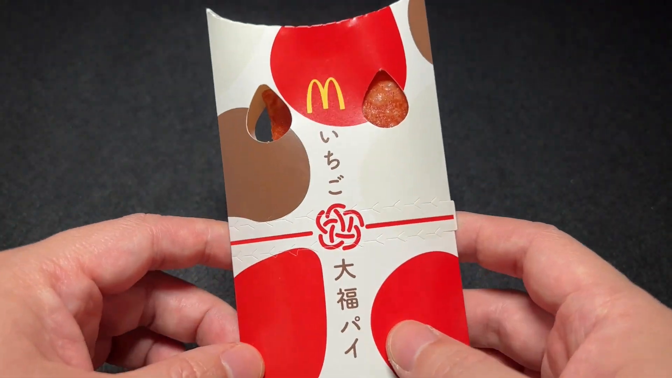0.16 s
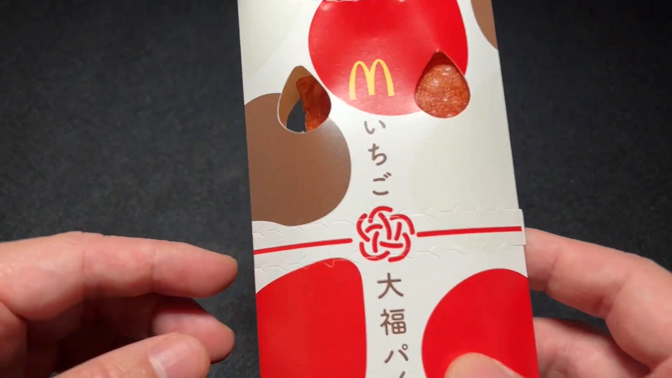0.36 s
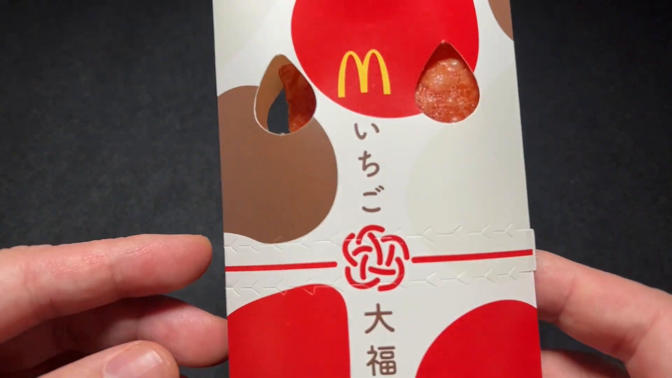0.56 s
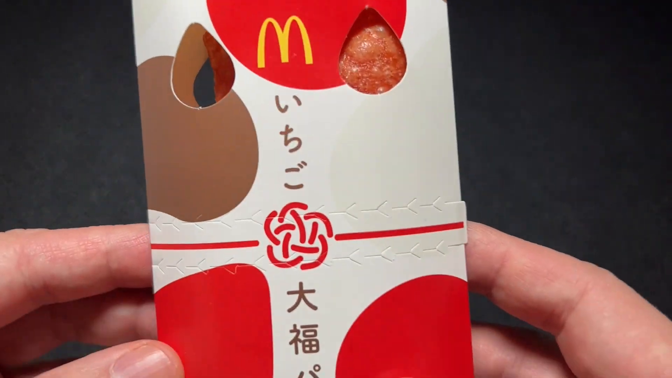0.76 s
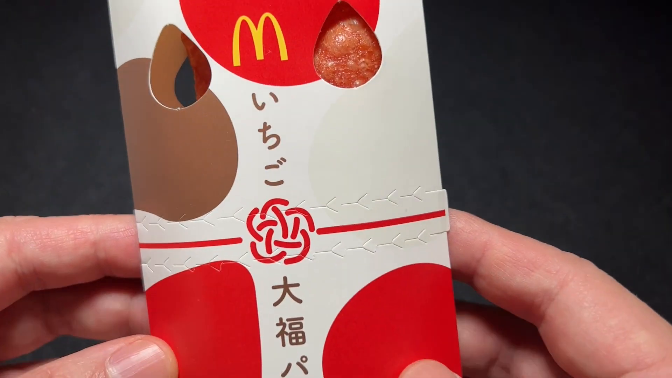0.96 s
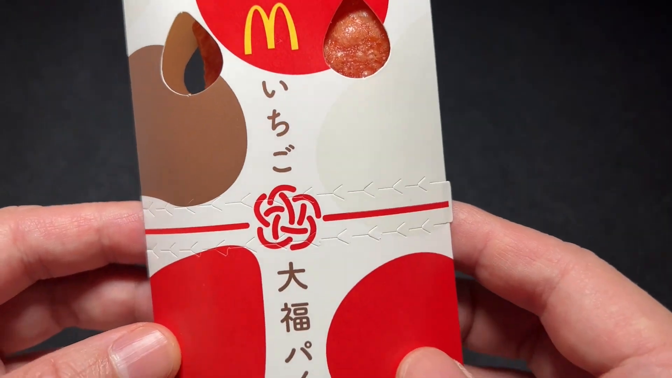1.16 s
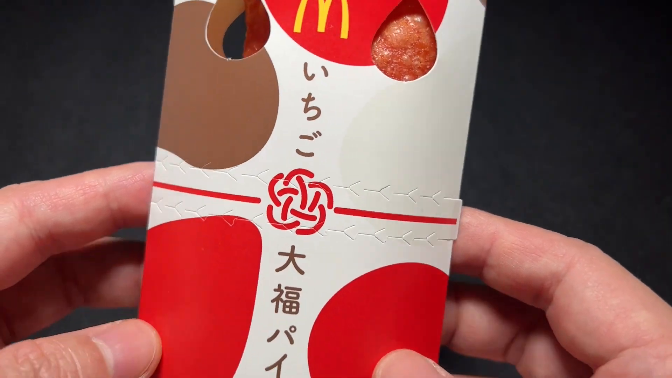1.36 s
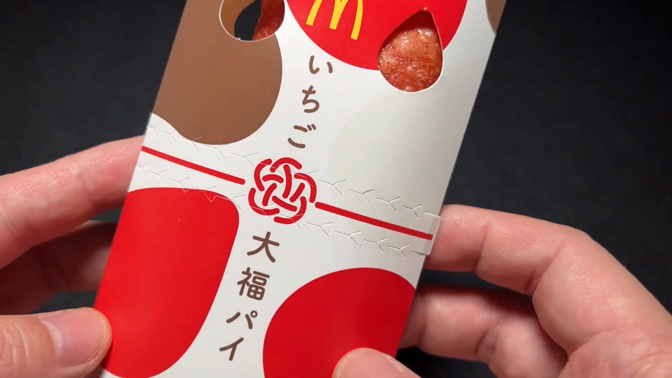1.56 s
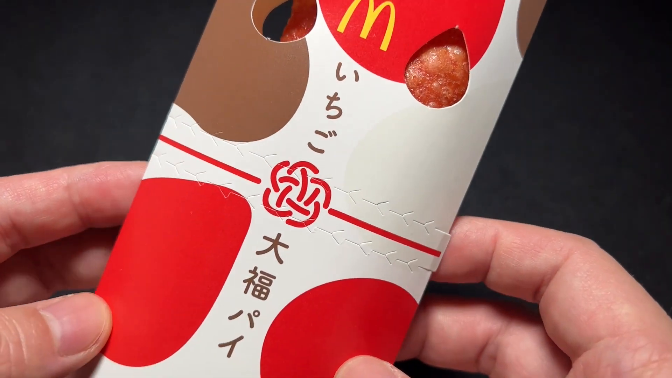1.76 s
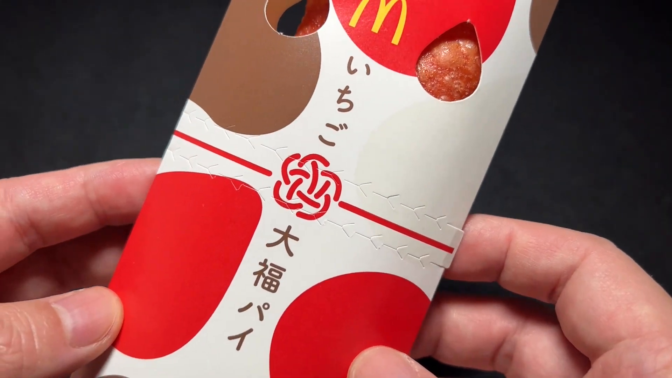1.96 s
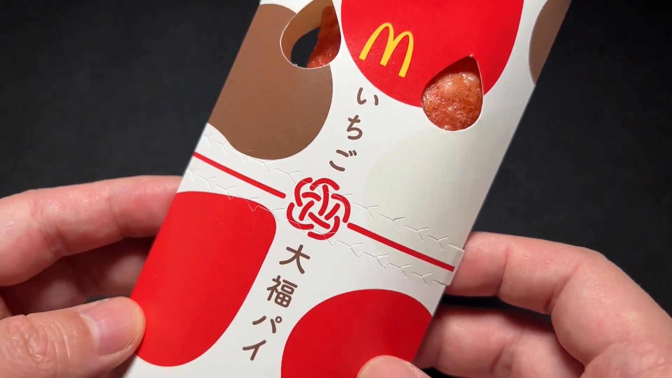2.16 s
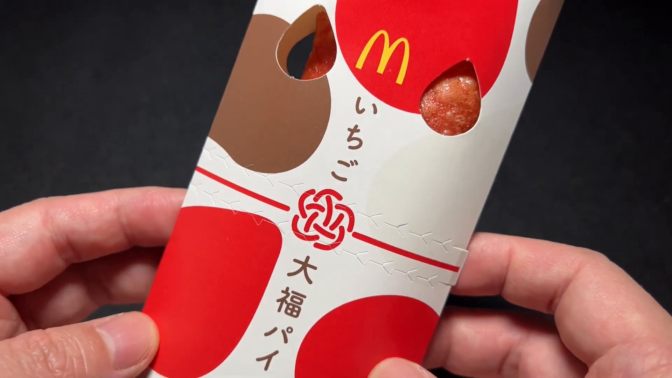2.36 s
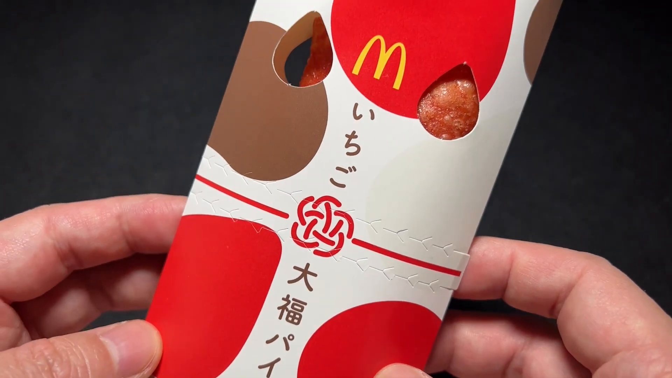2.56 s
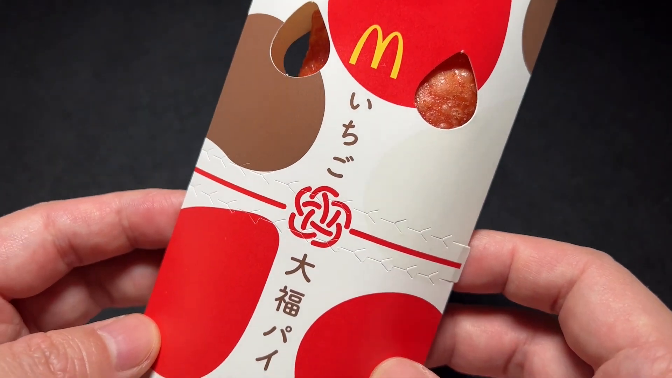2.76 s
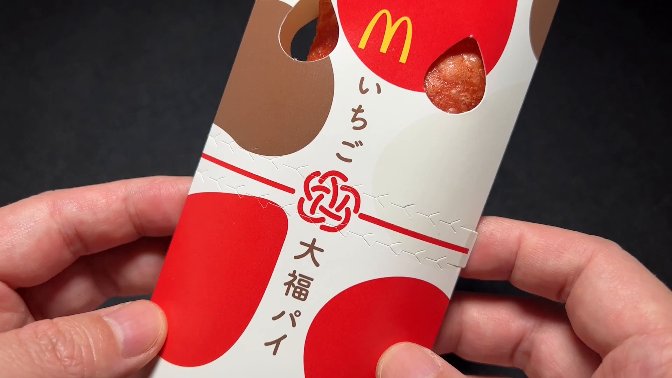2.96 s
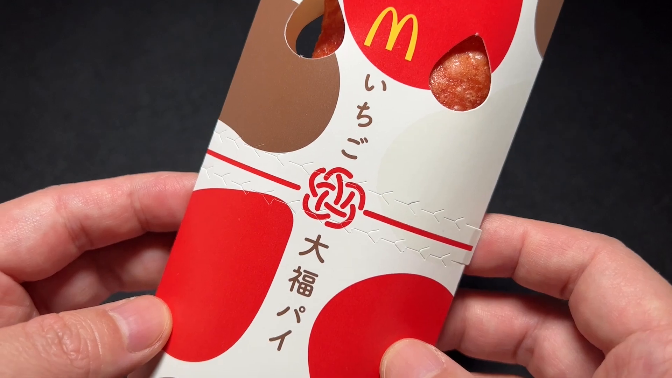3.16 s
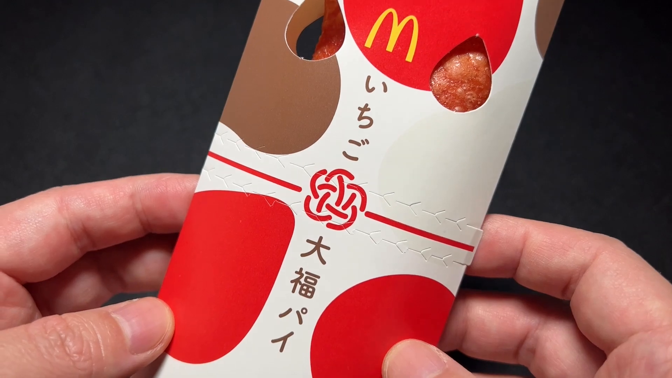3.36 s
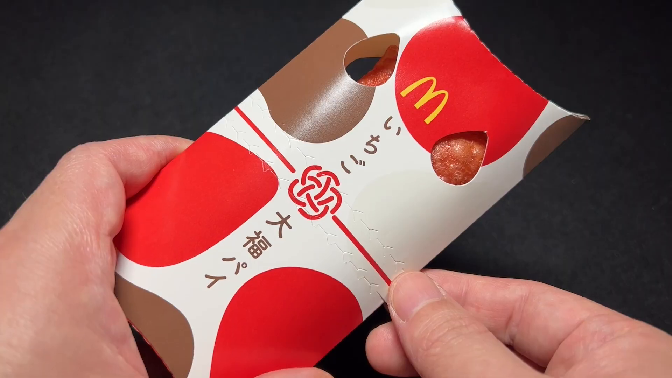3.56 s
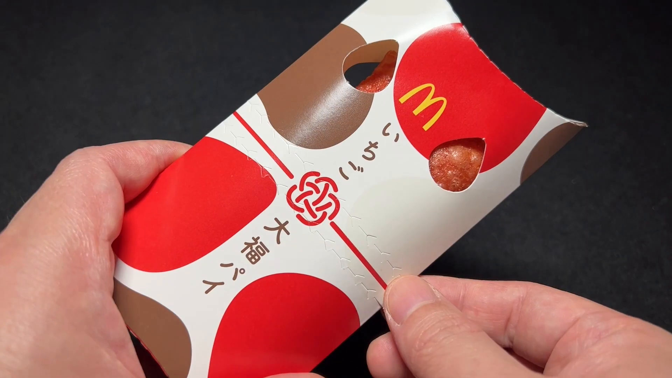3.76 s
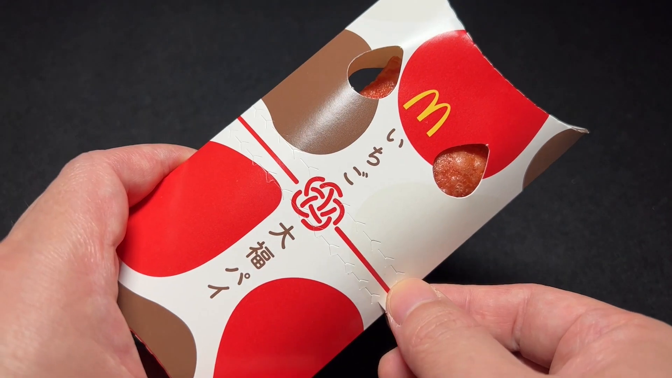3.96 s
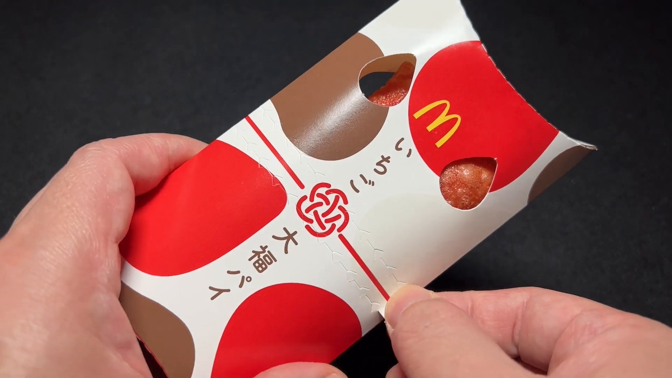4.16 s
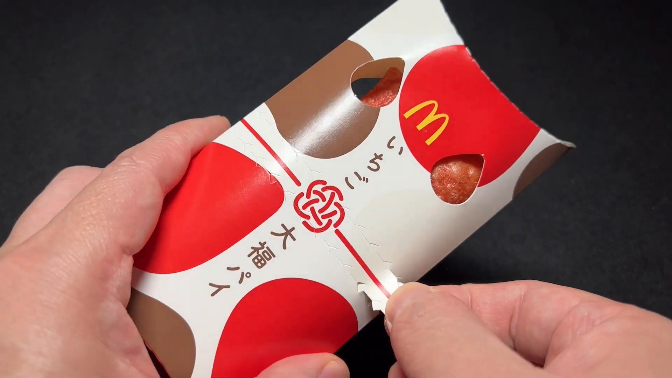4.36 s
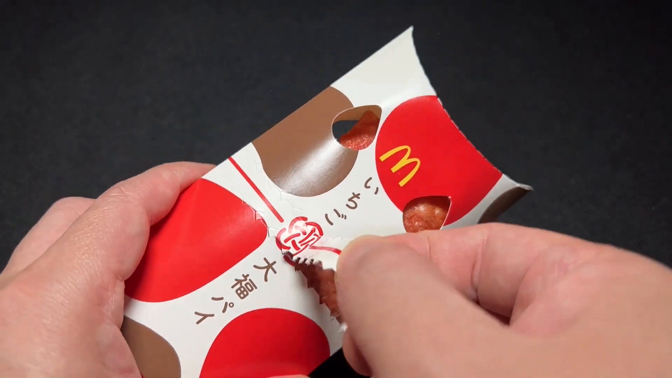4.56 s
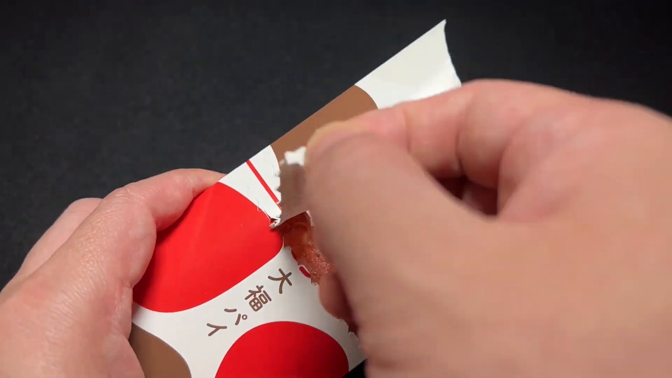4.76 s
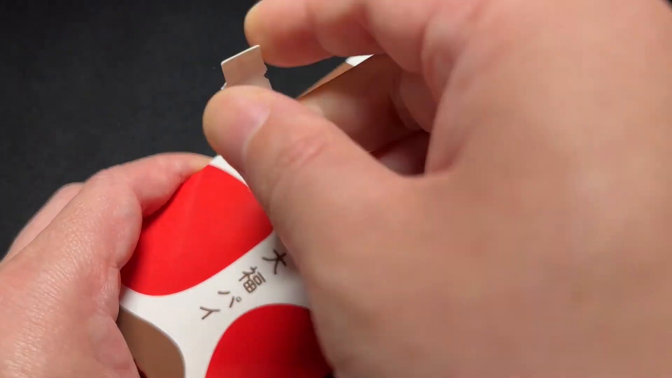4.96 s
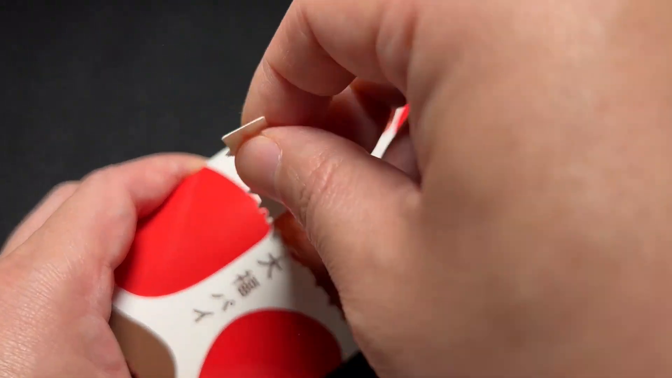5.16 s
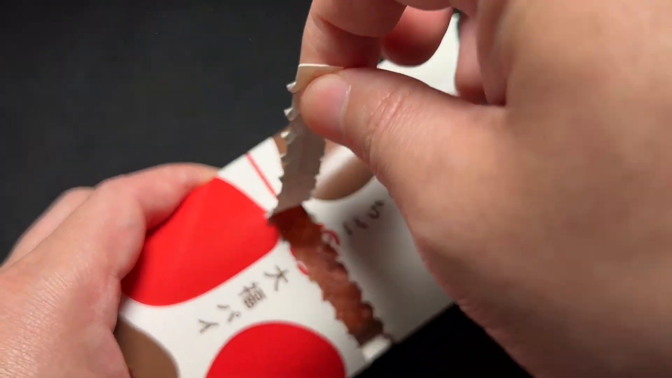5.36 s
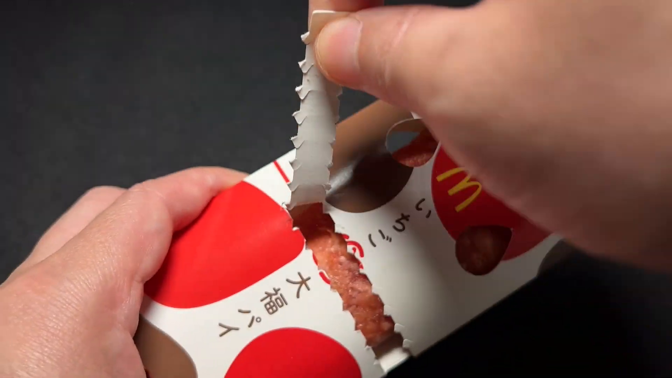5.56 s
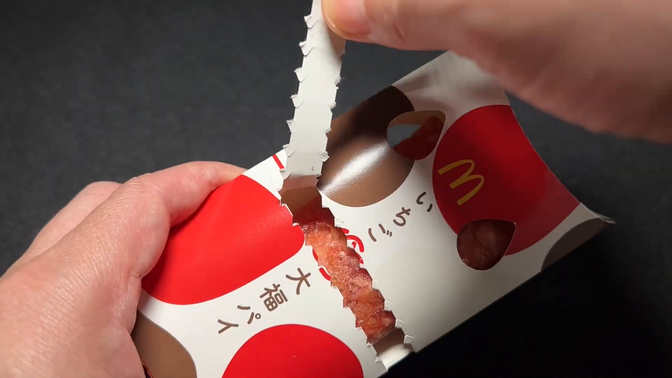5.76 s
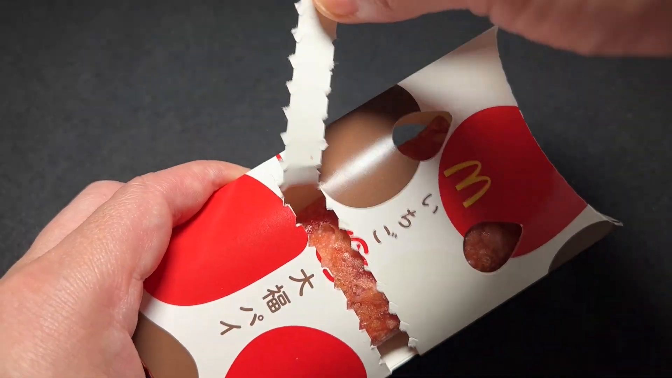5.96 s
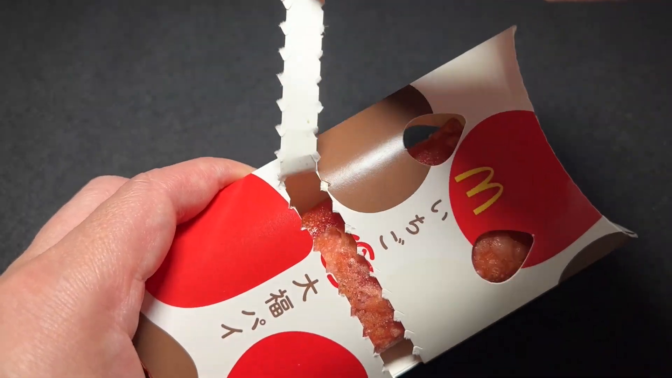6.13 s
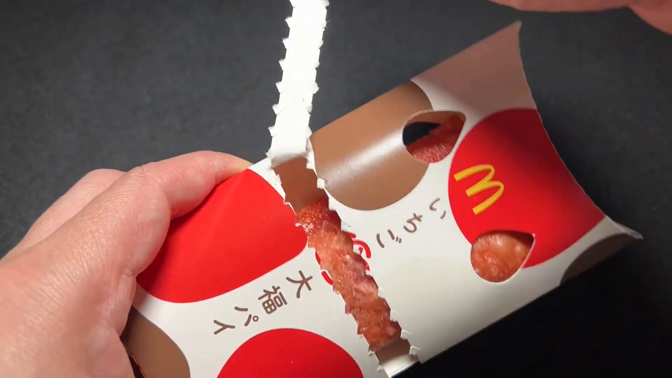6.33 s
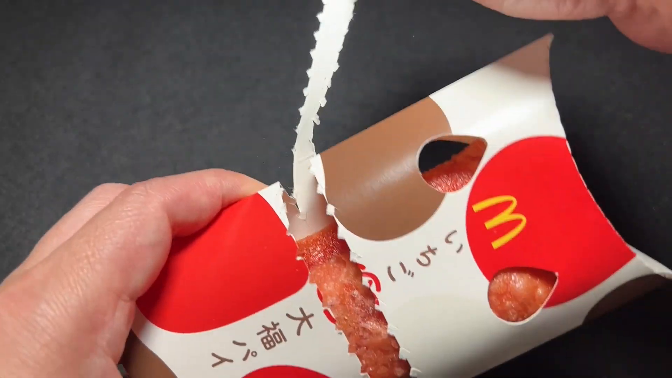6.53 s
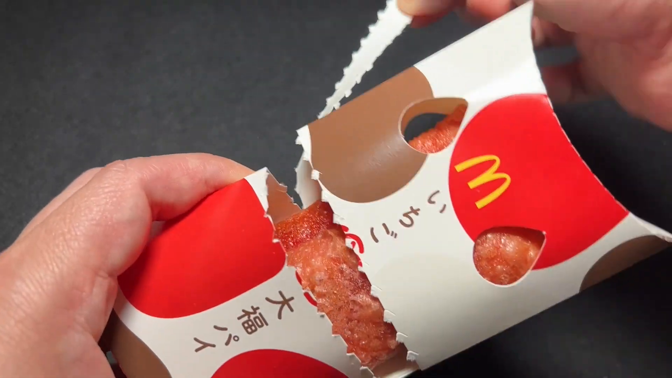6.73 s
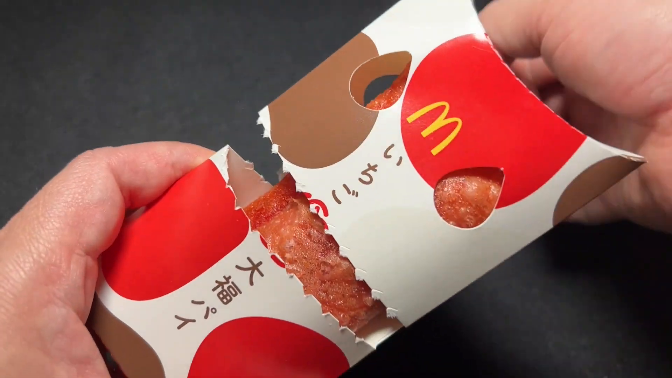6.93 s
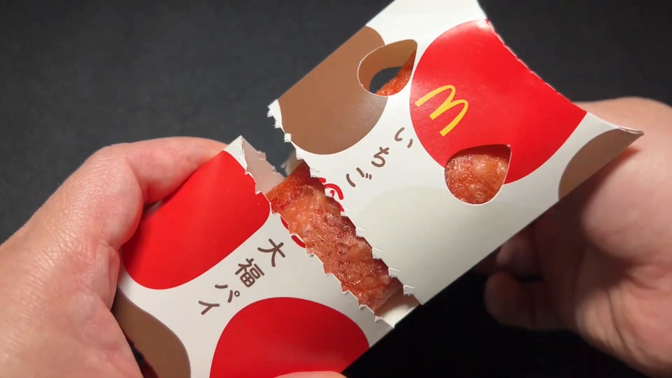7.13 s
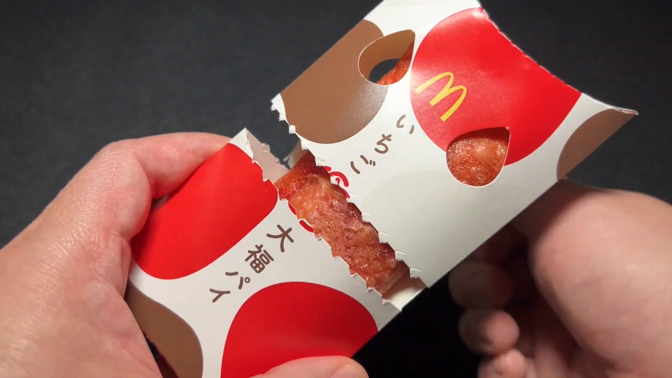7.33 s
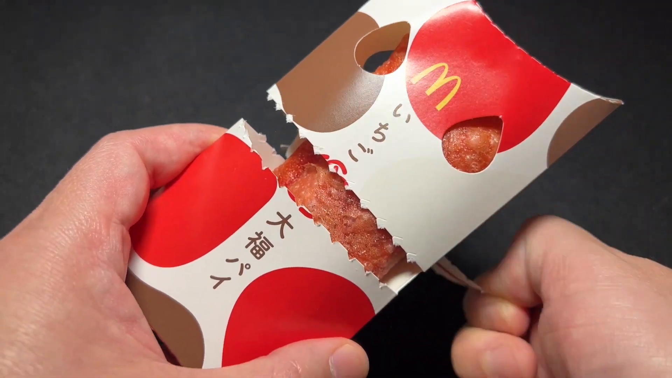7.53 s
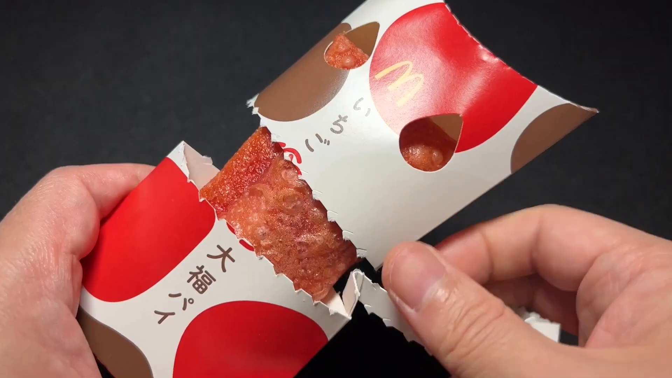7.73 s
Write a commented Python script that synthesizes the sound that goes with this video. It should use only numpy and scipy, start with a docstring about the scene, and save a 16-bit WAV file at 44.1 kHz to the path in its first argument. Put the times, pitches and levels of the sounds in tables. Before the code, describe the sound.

A paperboard sleeve is softly rubbed by fingers, then ripped along a perforated strip in sharp crackling snaps, close up in a quiet room.

```python
"""Tearing open a paperboard sleeve

In a quiet room, close to a two-port microphone, a paperboard sleeve is handled, then torn along a perforated strip.
Each paper bridge snaps as a noise crack that rings the sleeve through resonances and jolts the carton.
Fluttering noise makes the rubbing fingers and ripping fibres, with tiny pings for single fibres.
Behind them lies a faint hum: shaped noise for ventilation rumble and microphone hiss."""
import sys
import numpy as np
from scipy import signal
from scipy.fft import rfft, irfft, next_fast_len
from scipy.io import wavfile
from scipy.ndimage import uniform_filter1d, map_coordinates

SR = 44100
rng = np.random.default_rng(int(sys.argv[2]) if len(sys.argv) > 2 else 0)


def wrap_up_sound(samples):
    """Save the sound to the file named by the first command line argument, as 16-bit audio."""
    columns = np.atleast_2d(samples).T
    # keep every value between -1 and 1, then stretch to whole-number steps
    tamed = np.clip(columns, -1, 1)
    steps = np.round(tamed * 32767).astype(np.int16)
    wavfile.write(sys.argv[1], SR, steps)


N = 343539  # length [samples]

# Snaps and ticks of the board:
# (time [s], level [dB], panel pitch [Hz], ring peak over crack peak [dB], thump level over crack peak [dB])
BOARD_SNAPS = [(0.2115, -30.5, 1470, -6, -25), (0.6794, -49, 1550, 18.5, 6), (0.7071, -48, 790, 19, 7),
               (3.779, -34.5, 2610, -33, -57), (3.8537, -40.5, 1620, -15, -44),
               (3.926, -38.5, 1470, -11, -49), (4.0041, -40.5, 950, 3, -21), (4.232, -38.5, 1308, 7, -19),
               (4.273, -23, 1680, -41, -41.5), (4.322, -25, 1580, 8, -30.5), (4.3373, -18, 1540, 12.5, -14),
               (4.345, -1, 1176, -10, -48), (4.384, -12.5, 893, 3, -13.5), (4.3977, -1.5, 1084, -16, -20),
               (4.4342, -6, 1440, -7, -26.5), (4.4398, -2, 1450, -4, -17), (4.466, -4, 1235, -4.5, -20),
               (4.476, -6, 1286, -3, -26.5), (4.489, -7.5, 2020, -9, -39.5), (4.5, -6.5, 1390, 4, -39),
               (4.5129, -1.5, 1599, -7, -18.5), (4.5377, -13, 1305, 7, -12.5), (4.5731, -9, 2383, -10, -42),
               (4.581, -4.5, 1383, 1.5, -37), (4.598, -8, 1260, 1, -15), (4.643, -17, 2310, 7.5, -2),
               (4.6848, -9, 1240, -3, -19), (4.8271, -46, 1060, 22, 4.5), (4.866, -41.5, 1280, 16.5, -6),
               (4.961, -47, 1280, 5, -10.5), (5.1132, -24, 1387, -2.5, -21), (5.3485, -36, 1750, -7, -55),
               (5.432, -27, 1680, -13, -83), (5.486, -28.5, 1290, -12, -48), (5.5138, -5, 1155, -8, -26),
               (5.553, -20, 1150, -7, -37), (5.58, -7, 1020, -7.5, -30.5), (5.719, -39, 2330, -14.5, -43),
               (5.904, -34, 2750, -24, -38), (5.9595, -8, 2400, -6.5, -29), (5.9993, -30, 2480, -7.5, -27),
               (6.062, -32, 1300, -6.5, -49), (6.093, -21.5, 2140, 3, -31), (6.099, -17, 2950, -2, -30),
               (6.147, -36, 1410, -6, -32), (6.217, -35.5, 2320, -35, -46), (6.2362, -35, 1090, -31, -53),
               (6.2999, -16.5, 2680, -34, -55.5), (6.3131, -19, 2730, -6.5, -46),
               (6.322, -14.5, 2690, 1, -16.5), (6.3438, -7.5, 2820, -2.5, -21),
               (6.3596, -15.5, 1960, 2.5, -27.5), (6.3676, -10, 2685, 5, -21),
               (6.402, -17.5, 1230, -8.5, -62), (6.4112, -11.5, 1340, -11, -25),
               (6.548, -35.5, 1480, 7, -34.5), (6.56, -5.5, 1226, -2, -34), (6.5991, -19, 1590, 3, -28),
               (6.6192, -12.5, 2470, 4, -43), (6.664, -34, 1700, 4, -49.5), (6.6737, -14, 1240, -11, -37),
               (6.751, -20, 1230, -3, -23), (6.7765, -10, 1090, 3, -11), (6.927, -40.5, 1070, -7, -28),
               (7.141, -30, 1720, -5, -49), (7.334, -28, 1047, -16, -48), (7.409, -25, 1090, -9, -52),
               (7.4307, -23, 2670, -6.5, -59), (7.5395, -13.5, 1530, -8.5, -27),
               (7.549, -18.5, 1540, -15, -38), (7.5763, -26.5, 1400, 8.5, -15),
               (7.612, -11.5, 1070, 1, -18)]
# The tear travels round the sleeve and changes what it shakes:
# (time [s], low knock pitch [Hz], low knock level [dB], upper modes level [dB])
TEAR_PATH = [(0.7, 680, 9.5, 1), (4.5, 540, 0.5, -1), (6.2, 453, -8.5, 2.5), (6.8, 603, 5.5, 4),
             (7.6, 330, 2.5, -2.5)]
# Resonances of the hollow sleeve, before the tear's weighting: (frequency [Hz], width [Hz], level [dB])
SLEEVE_MODES = [(396, 36, -14), (790, 30, -20.5), (1330, 120, -15), (2180, 160, -10), (2574, 120, -8.5)]
# Colour of breaking fibres: (frequency [Hz], level [dB])
CRACK_COLOUR = [(300, -43), (2000, -3), (4000, -7.5), (6000, -4.5), (9000, -5.5), (12500, 0.5),
                (16000, -11)]
# Likeness of the two ports for sounds close by: (frequency [Hz], left-right likeness [0-1])
NEAR_LIKENESS = [(100, 0.99), (500, 0.65), (1700, 0.58), (3500, 0.4), (8000, 0.72)]


def snaps():
    """Paper bridges break: a bright crack, a brief ring of panel and sleeve, a jolt of the whole carton."""
    lead = 400  # samples of swell ahead of the listed time
    out = np.zeros((2, N + SR))
    t = (np.arange(4000) - lead) / SR - .001  # the break comes 1 ms after the listed time
    tear_s, *tear = np.transpose(TEAR_PATH)
    for s, db, panel_hz, ring_db, thump_db in BOARD_SNAPS:
        knock_hz, knock_db, upper_db = (np.interp(s, tear_s, column) for column in tear)
        swell = 0.00081 * amp(db / 4)  # [s]; big bridges stretch before they part, small ticks are sudden
        blow = peak(crack(t, swell)) + amp(ring_db) * peak(ring(t, swell, panel_hz, knock_db, upper_db))
        jolt = amp(thump_db) * peak(thump(t, knock_hz, knock_db))
        start = round(s * SR) - lead
        out[:, start:start + len(t)] += amp(db) * (ports(blow, NEAR_LIKENESS) + jolt)
    return out[:, :N]


def crack(t, swell):
    """Breaking fibres: a short noise burst and a fainter, longer one, coloured by small torn flaps."""
    flap_hz = np.exp(rng.uniform(np.log(3500), np.log(9000), 3))  # new flaps for each crack
    noise = burst(t, swell, 0.013) + 0.21 * burst(t, 6 * swell, 0.057)

    def colour(f):
        flaps = sum(mode(f, hz, 300) for hz in flap_hz)
        return amp(along(CRACK_COLOUR, f)) * (0.88 + flaps)

    return filtered(noise, colour)


def ring(t, swell, panel_hz, knock_db, upper_db):
    """Noise bursts excite the panel's resonance, the hollow sleeve's modes and one broad resonance."""
    share_db = np.array([knock_db, 0, 0, upper_db, upper_db])
    # each spot excites the sleeve differently
    share = amp(rng.normal(0, 3, len(SLEEVE_MODES)) + share_db)
    noise = burst(t, swell, 0.0025) + burst(t, 3 * swell, 0.02) + 0.24 * burst(t, swell, 0.062)

    def body(f):
        hollow = sum((-1) ** k * gain * amp(db) * mode(f, hz, width)
                     for k, (gain, (hz, width, db)) in enumerate(zip(share, SLEEVE_MODES)))
        return mode(f, panel_hz, 220) + hollow + 0.21 * mode(f, 1300, 2200)

    return filtered(noise, body)


def thump(t, knock_hz, knock_db):
    """One soft shove of the carton, either way, sets off a low knock and a slower sway."""
    push = np.exp(-(t / 0.00066) ** 2) * rng.choice([-1, 1]) * np.ones((2, 1))
    sway_hz = 110 * np.exp(rng.normal(0, 0.4))  # the grip shifts from blow to blow

    def carton(f):
        sway = 0.17 * mode(f, sway_hz, 66) ** 3  # cubed: it builds up after the knock
        return sway + 0.25 * amp(knock_db) * mode(f, knock_hz, 250)

    return filtered(push, carton)


def burst(t, rise, t60):
    """Noise as fibres give way in uneven clumps: it swells up to t = 0, then dies 60 dB in t60 [s]."""
    clumps = amp(2.5 * np.repeat(rng.standard_normal(len(t) // 40), 40))
    envelope = np.where(t < 0, np.exp(np.minimum(t, 0) / rise), amp(-60 * t / t60))
    return clumps * rng.standard_normal((2, len(t))) * envelope


# Pulls on the strip, ripping fibres along the torn edge:
# (start [s], length [s], body gain at mid-pull [dB], hiss gain at mid-pull [dB], change over the pull [dB])
STRIP_PULLS = [(3.93, 0.19, -74.5, -82, -6), (4.105, 0.0068, -56.5, -71, 4), (4.15, 0.17, -69, -68, 15),
               (4.32, 0.34, -49.5, -47.5, -10), (4.62, 0.13, -73, -55.5, -22),
               (4.78, 0.086, -54, -64.5, 14), (5.01, 0.13, -58.5, -68, -3), (5.44, 0.068, -63, -49.5, 4.5),
               (5.52, 0.14, -73, -56.5, -3.5), (5.915, 0.036, -71.5, -53, 17.5),
               (5.97, 0.056, -65.5, -61, -13), (6.075, 0.064, -49.5, -44, 1), (6.2, 0.15, -88, -57.5, 29),
               (6.295, 0.11, -45, -44.5, 19.5), (6.9, 0.25, -69, -74.5, 7), (6.55, 0.27, -59, -51.5, -7),
               (6.6, 0.023, -38.5, -41.5, -1), (7.047, 0.0039, -67.5, -56.5, 21.5),
               (7.24, 0.14, -84, -67, 16), (7.41, 0.049, -63, -50, 2.5), (7.475, 0.026, -54, -49.5, 1.5),
               (7.545, 0.045, -50, -58.5, 7.5), (7.645, 0.11, -64, -67, -37)]
# Finger strokes over the printed board:
# (start [s], length [s], body gain at mid-stroke [dB], hiss gain at mid-stroke [dB], change over it [dB])
FINGER_STROKES = [(0, 0.12, -62.5, -49.5, 3.5), (.19, 0.089, -55, -50.5, 4.5), (.68, 0.03, -57.5, -62, 8),
                  (.76, 0.1, -68.5, -49.5, 1), (.93, 0.041, -64, -56.5, -2), (1.27, 0.26, -55.5, -48, -5.5),
                  (1.455, 0.06, -50, -42.5, 3.5), (1.54, 0.059, -57.5, -59, -9),
                  (1.64, 0.087, -66, -82, -8), (1.77, 0.0028, -57.5, -51, 5), (2.04, 0.002, -65, -61, 5)]
# Colour of board under a rubbing finger: (frequency [Hz], level [dB])
SCRAPE_COLOUR = [(500, -19), (1000, -8.5), (2000, -11.5), (3000, -12.5), (5000, -26.5)]
STROKE_RISE, STROKE_FALL = 810, 505  # a finger lands and lifts [dB/s]
PULL_RISE, PULL_FALL = 660, 603  # a pull starts and slackens [dB/s]


def rub():
    """Dense stick-slip grains: noise that flutters fast, in the board's body and as bright hiss."""
    stroke_gain = contact_gains(FINGER_STROKES, STROKE_RISE, STROKE_FALL)
    body_gain, hiss_gain = stroke_gain + contact_gains(STRIP_PULLS, PULL_RISE, PULL_FALL)
    t = np.arange(N) / SR
    torn, freed = t > 3.6, t > 7.2  # [s]
    # skin on print is smooth, torn edges rasp
    flutter_db = (1.5 + 4.4 * torn) * wobble(65) + (1.0 + 0.99 * torn) * wobble(500)

    board = unit(filtered(rng.standard_normal((2, N)), lambda f: amp(along(SCRAPE_COLOUR, f))))
    # the closed sleeve sings in the hand
    whole = filtered(board, lambda f: 3 * mode(f, 1477, 122) - 1.7 * mode(f, 2330, 270)
                     + 0.98 * mode(f, 4000, 670))
    body = board + np.where(torn, 5.2 * opened_sleeve(board), whole)

    hiss = unit(filtered(rng.standard_normal((2, N)), lambda f: amp(along(CRACK_COLOUR, f))))
    dull = filtered(hiss, lambda f: 1 / (1 + (f / 7000) ** 4))
    # the freed strip adds its own resonances
    bright = np.where(torn, hiss, dull) + 3.8 * freed * strip(hiss)

    grains = amp(flutter_db) * (body_gain * body + hiss_gain * bright)
    crackle = (0.21 + 0.5 * torn) * hiss_gain * fibres(count=9000)
    return ports(patchy(grains, depth_db=1.0) + crackle, NEAR_LIKENESS)


def opened_sleeve(board):
    """A rip rings the hollow sleeve: its modes, weighted as the tear travels."""
    _, knock_db, upper_db = curves(TEAR_PATH)
    share_db = [knock_db, 0, 0, upper_db, upper_db]
    ringing = 0
    for k, (hz, width, db) in enumerate(SLEEVE_MODES):
        ringing = ringing + (-1) ** k * amp(db + share_db[k]) * filtered(board, lambda f: mode(f, hz, width))
    return ringing


def strip(hiss):
    """The strip's teeth catch unevenly: hiss of wavering level excites three resonances."""
    uneven = hiss * amp(3.6 * wobble(120))
    return filtered(uneven, lambda f: mode(f, 2700, 150) + 1.47 * mode(f, 4500, 237)
                    + 2.2 * mode(f, 1060, 110))


def contact_gains(rows, rise, fall):
    """Body and hiss gains: each contact rises, swells or sags while it lasts, then fades; powers add."""
    t = np.arange(0, N, 32) / SR
    power = 0
    for s, length, body_db, hiss_db, swell_db in rows:
        swelling = swell_db * (np.clip((t - s) / length, 0, 1) - .5)
        edges = rise * np.maximum(s - t, 0) + fall * np.maximum(t - s - length, 0)
        power = power + amp(swelling - edges + np.array([[body_db], [hiss_db]])) ** 2
    return np.array([np.interp(np.arange(N) / SR, t, gain) for gain in np.sqrt(power)])


def fibres(count):
    """Single fibres let go: tiny damped pings of scattered pitch, most faint, a few strong."""
    when, pitch, size, side = rng.random((count, 4)).T
    t = np.arange(160) / SR
    hz = (1200 * 7 ** pitch)[:, None]
    strength = amp(20 * size ** 8.2)[:, None] * np.sqrt(hz)
    pings = strength * np.sin(2 * np.pi * hz * t) * np.exp(-t * hz / 3.4)
    at = ((when * N).astype(int)[:, None] + np.arange(len(t))).ravel()
    gains = np.cos(side * 2 * np.pi), np.sin(side * 2 * np.pi)  # left, right
    return unit(np.array([np.bincount(at, (pings * g[:, None]).ravel(), N + len(t))[:N] for g in gains]))


def patchy(x, depth_db):
    """The colour shifts as the contact moves: random gain patches in time and frequency."""
    z = signal.stft(x, nperseg=256)[2]
    field = uniform_filter1d(rng.standard_normal(z.shape[1:]), size=3, axis=0)  # over frequency
    field = uniform_filter1d(field, size=10, axis=1)  # over time
    return signal.istft(z * amp(depth_db * unit(field)), nperseg=256)[1][:, :N]


# Colour of the room tone: (frequency [Hz], relative density [dB per Hz])
ROOM_COLOUR = [(25, -11), (55, 4), (100, -9.5), (250, -15.5), (500, -20), (1400, -30), (3000, -34.5),
               (9000, -39), (13000, -38.5), (13600, -77.5)]
# The room tone's level, with an abrupt drop: (time [s], level [dB])
ROOM_LEVEL = [(0, -58.5), (3.6, -59.5), (3.61, -70.5), (6.5, -65.5), (7.2, -60.5), (7.79, -70)]
# Likeness of the two ports for the room tone: (frequency [Hz], left-right likeness [0-1])
ROOM_LIKENESS = [(60, 0.98), (300, 0.4), (1000, 0.024)]


def hum():
    """Ventilation rumble and microphone hiss: steady noise, shaped in frequency, on a level curve."""
    noise = unit(filtered(rng.standard_normal((2, N)), lambda f: amp(along(ROOM_COLOUR, f))))
    return amp(curves(ROOM_LEVEL)[0]) * ports(noise, ROOM_LIKENESS)


def amp(db):
    """Decibels to amplitude."""
    return 10 ** (np.asarray(db) / 20)


def unit(x):
    """x scaled to an RMS of 1."""
    return x / np.sqrt(np.mean(x ** 2) + 1e-20)


def peak(x):
    """x scaled to a peak of 1."""
    return x / np.abs(x).max()


def along(points, hz):
    """(Hz, value) points read on a log frequency axis."""
    f, v = np.transpose(points)
    return np.interp(np.log(hz + 1), np.log(f + 1), v)


def curves(rows):
    """One value per sample for each column after the time."""
    s, *columns = np.transpose(rows)
    return [np.interp(np.arange(N) / SR, s, column) for column in columns]


def wobble(rate):
    """A smooth random curve, rate knots a second."""
    return map_coordinates(rng.standard_normal(int(N * rate / SR) + 4), [np.arange(N) * rate / SR])


def filtered(x, response):
    """x shaped by a complex response of frequency."""
    n = x.shape[-1]
    m = next_fast_len(n + 4096)  # room for the tails
    return irfft(rfft(x, m) * response(np.fft.rfftfreq(m, 1 / SR)), m)[..., :n]


def mode(f, hz, width_hz):
    """One causal resonance, gain 1 at its centre."""
    return 1j * f * width_hz / (hz * hz - f * f + 1j * f * width_hz)


def ports(pair, alike):
    """Two unrelated versions of a sound become left and right of the given likeness."""
    def mid_side(hz):
        turn = np.arccos(np.clip(along(alike, hz), -1, 1)) / 2
        return np.array([np.cos(turn), np.sin(turn)])

    mid, side = filtered(pair, mid_side)
    return np.array([mid + side, mid - side])


# Level between the ports, the right one facing the hands: (frequency [Hz], left over right [dB])
PORT_BALANCE = [(100, 0), (700, -3), (2400, -1), (4500, -5), (7500, -2.5), (9000, -0.5)]
# Phase between the two ports of one housing: (frequency [Hz], left leads by [rad])
PORT_LEAD = [(80, -.3), (520, -.9), (1400, -.1), (2760, -1.7), (3450, -1.4), (4300, 0), (6200, -.8),
             (7600, -1.4), (9000, 0), (12000, 5.8), (15900, 13)]


def scene():
    """The close sounds reach two ports differing in level and phase; the room hum joins after that."""
    def housing(f):
        left_over_right = amp(along(PORT_BALANCE, f)) * np.exp(1j * along(PORT_LEAD, f))
        return left_over_right ** np.array([[.5], [-.5]])  # half the difference to each port

    impulse = np.fft.fftshift(irfft(housing(np.fft.rfftfreq(512, 1 / SR))), 1) * np.hanning(512)
    return signal.fftconvolve(snaps() + rub(), impulse, "same", axes=1) + hum()


# Dips of the microphone housing: (frequency [Hz], width [Hz], level [dB])
HOUSING_DIPS = [(10440, 670, -10.5), (13250, 1300, -10.5)]
TOP_HZ = 15800  # band limit


def record(dry):
    """The housing notches the treble, deep bass is lost, the loudest snaps are squeezed, the band ends."""
    def microphone(f):
        dips_db = sum(db * np.exp(-((f - hz) / width) ** 2) for hz, width, db in HOUSING_DIPS)
        return amp(dips_db) * (1j * f / (45 + 1j * f)) ** 2  # bass falls away below 45 Hz

    heard = filtered(dry, microphone)
    squeezed = heard / (1 + np.abs(heard / .85) ** 4) ** .25  # never beyond 0.85
    return filtered(squeezed, lambda f: (1 - np.tanh((f - TOP_HZ) / 40)) / 2)


dry = scene()
out = record(dry)
wrap_up_sound(out)
```